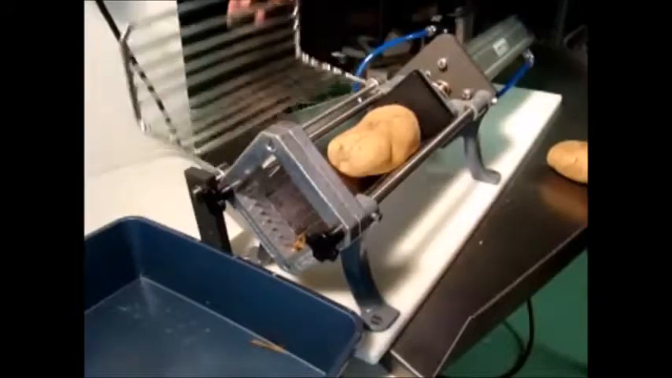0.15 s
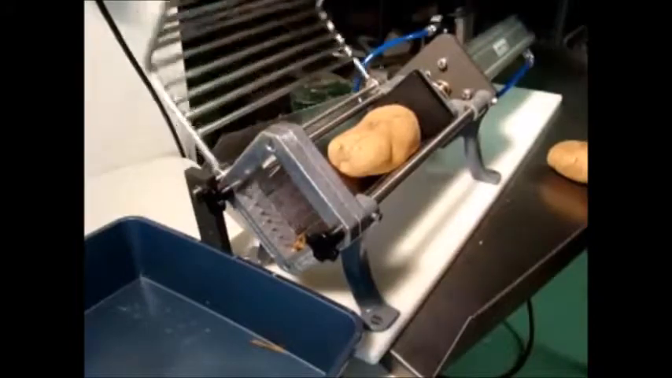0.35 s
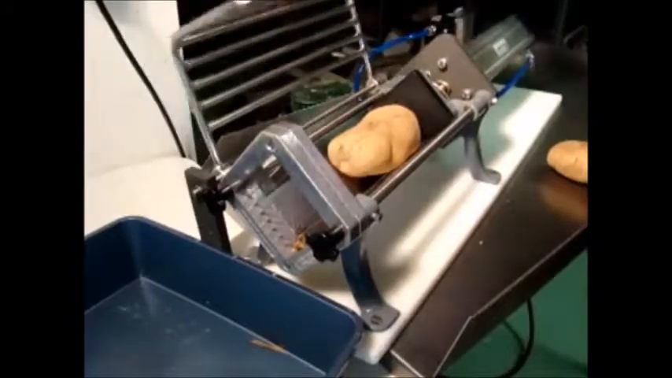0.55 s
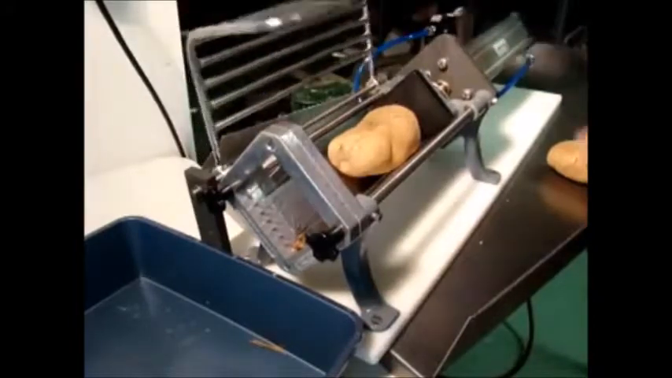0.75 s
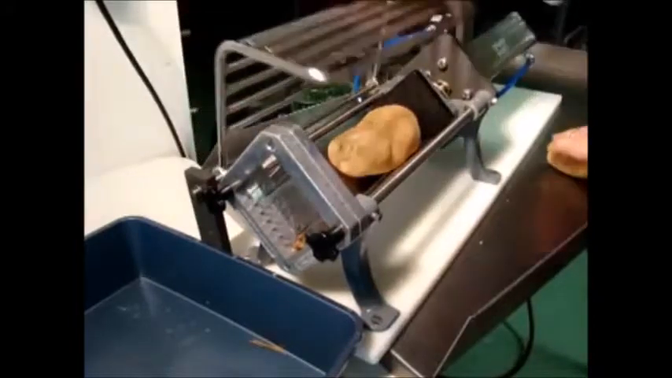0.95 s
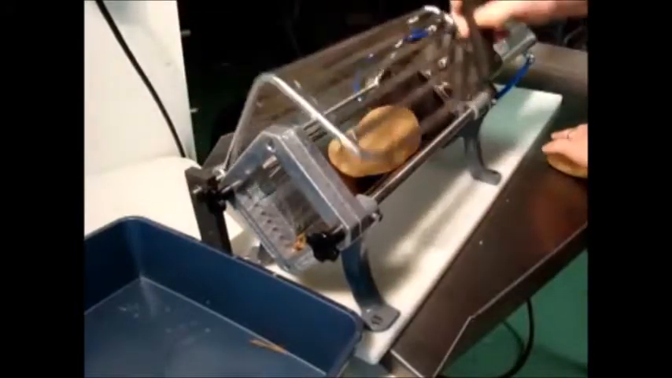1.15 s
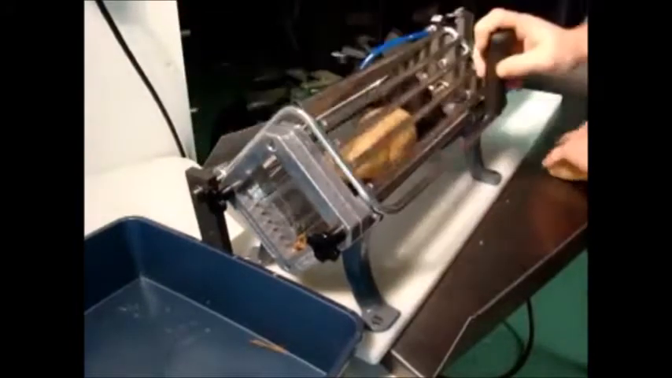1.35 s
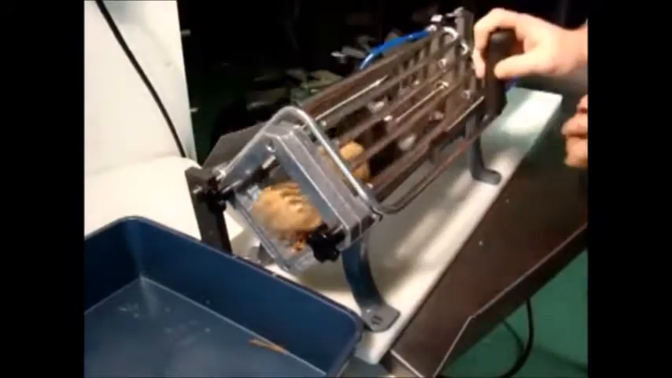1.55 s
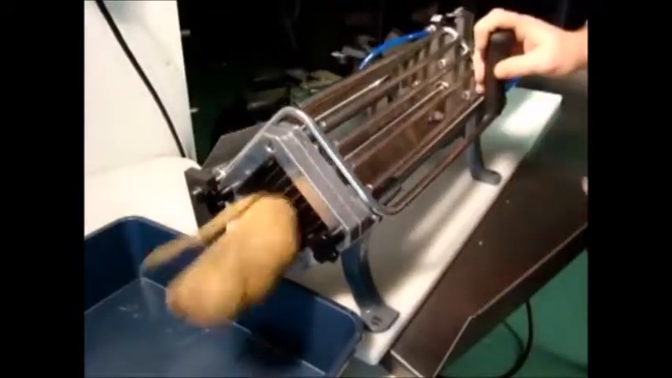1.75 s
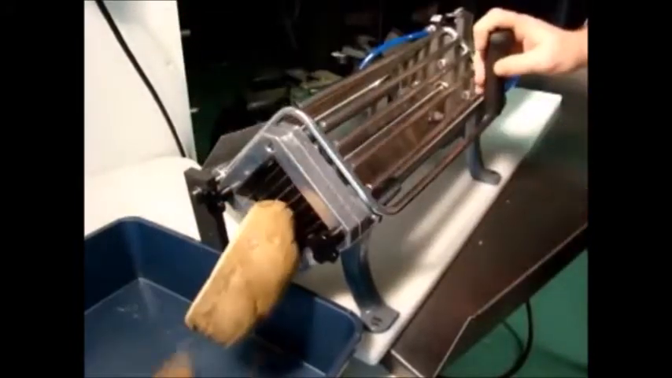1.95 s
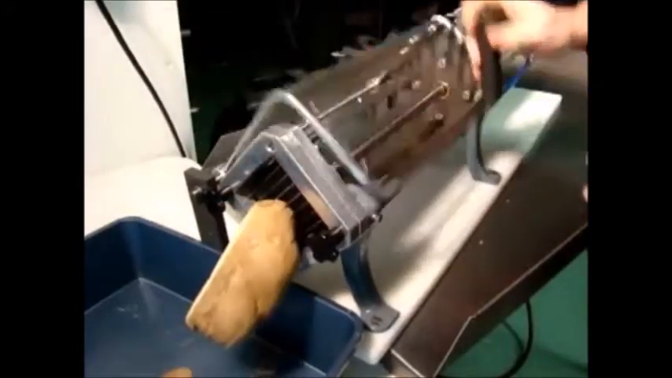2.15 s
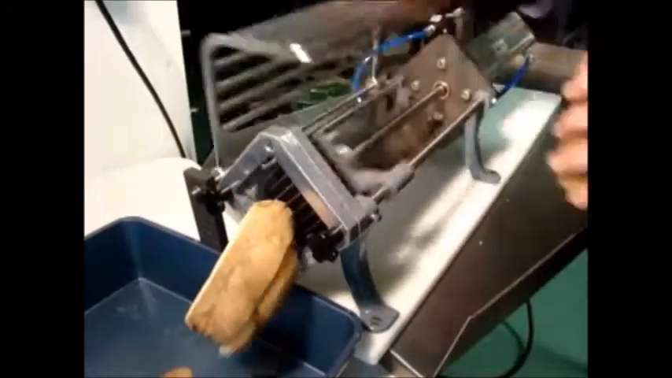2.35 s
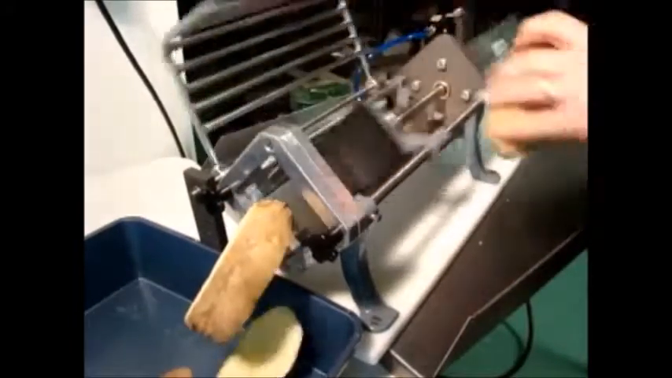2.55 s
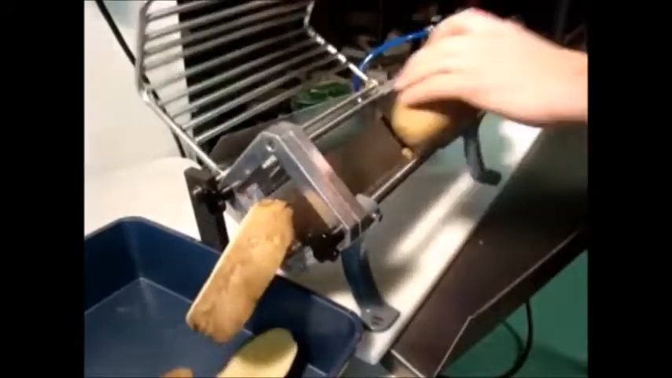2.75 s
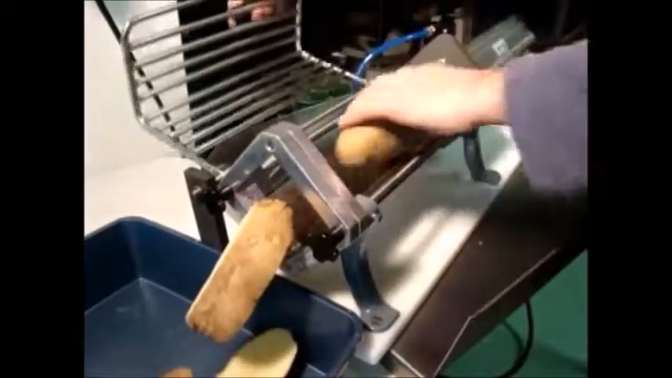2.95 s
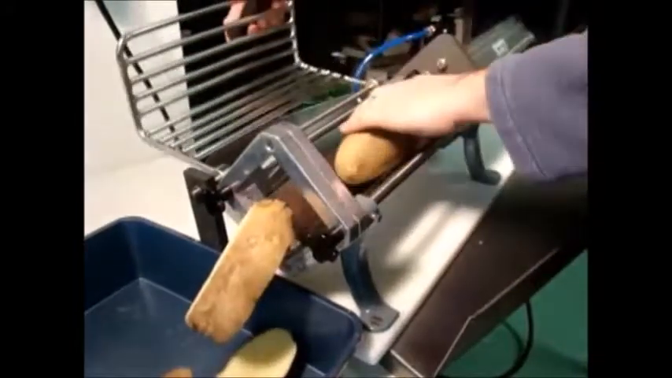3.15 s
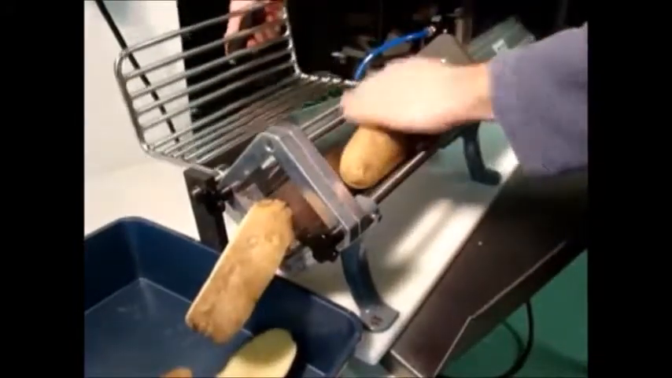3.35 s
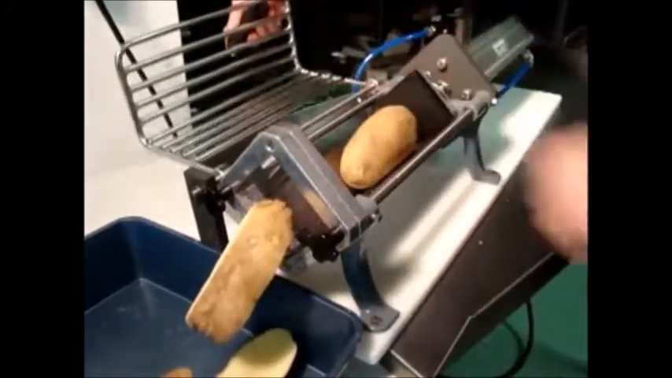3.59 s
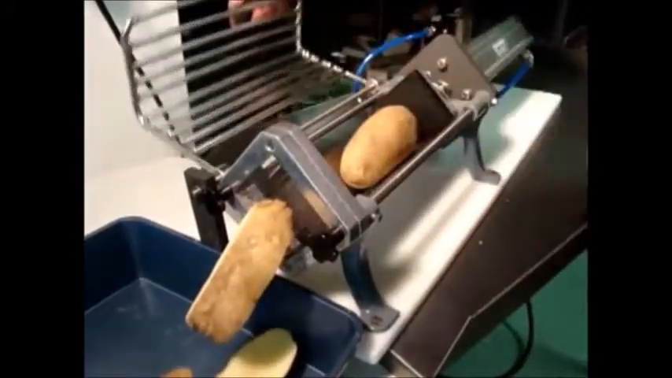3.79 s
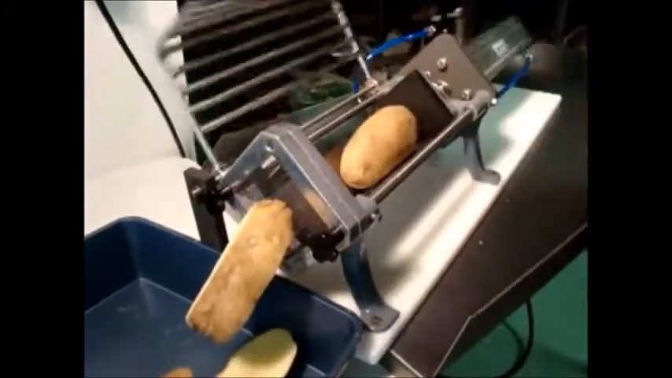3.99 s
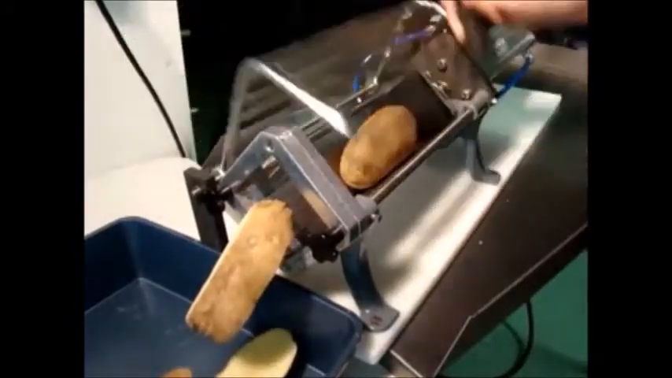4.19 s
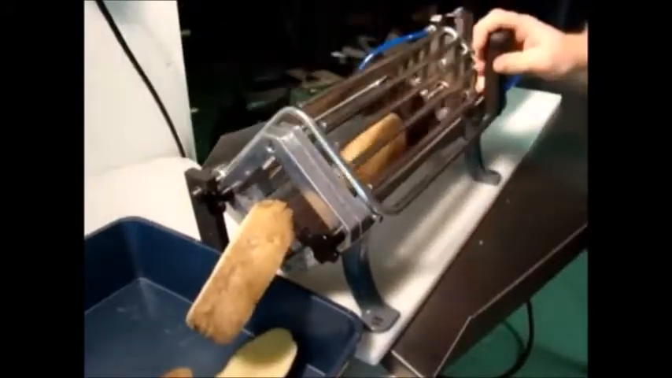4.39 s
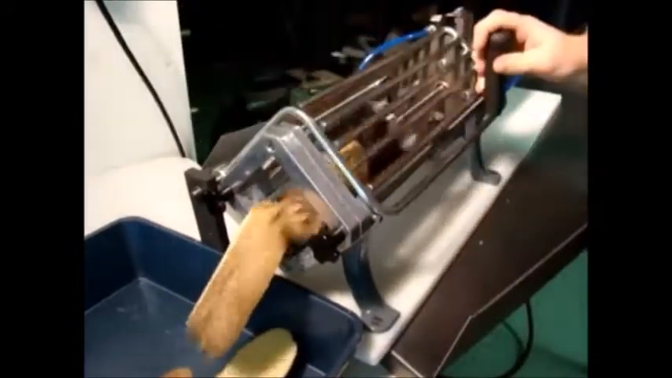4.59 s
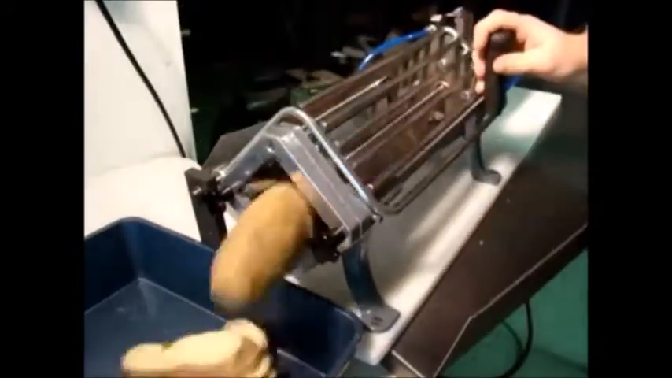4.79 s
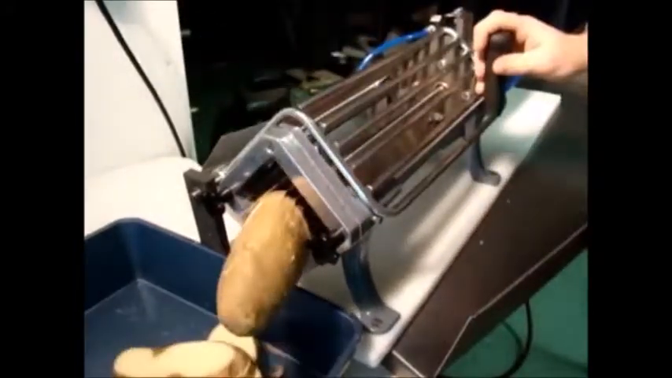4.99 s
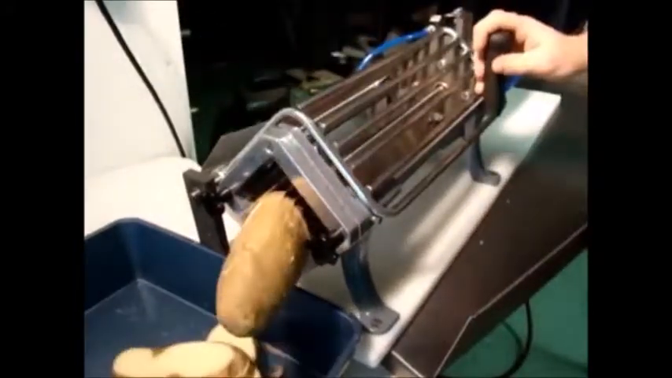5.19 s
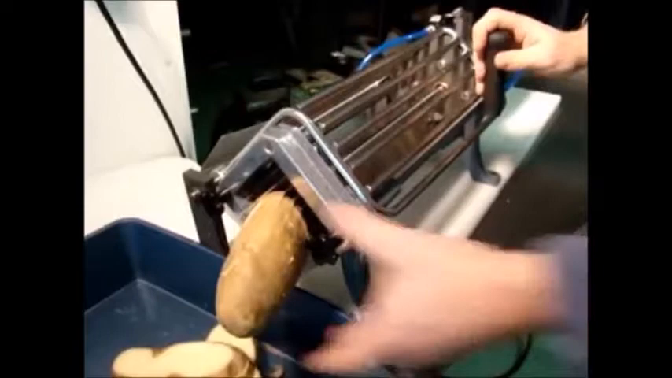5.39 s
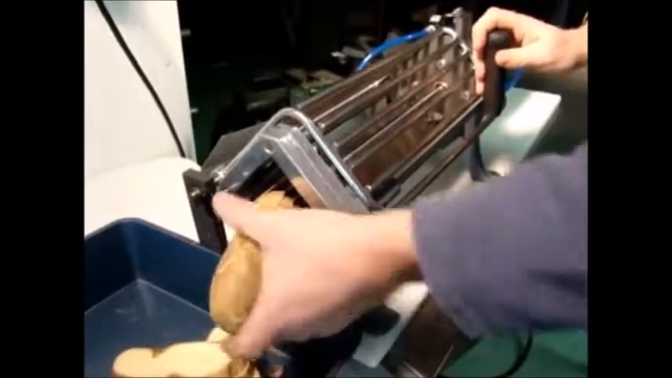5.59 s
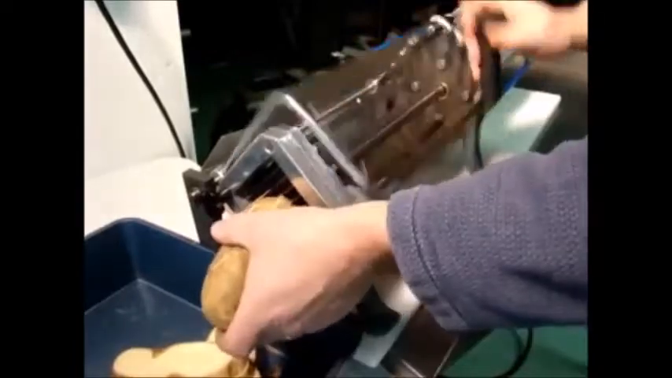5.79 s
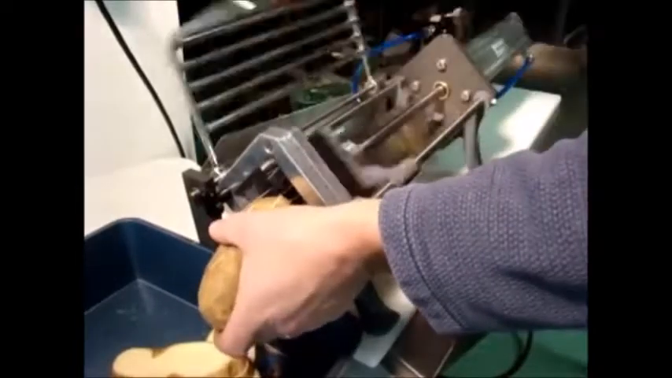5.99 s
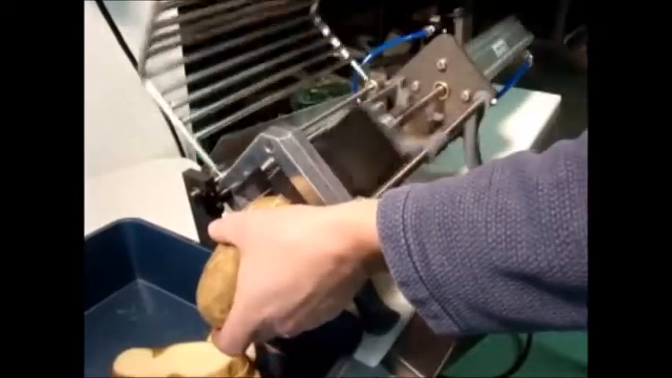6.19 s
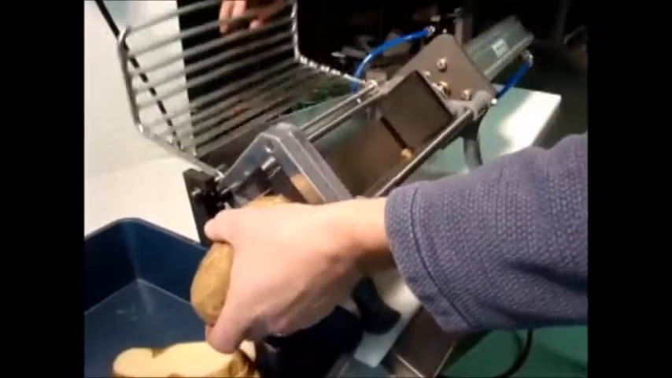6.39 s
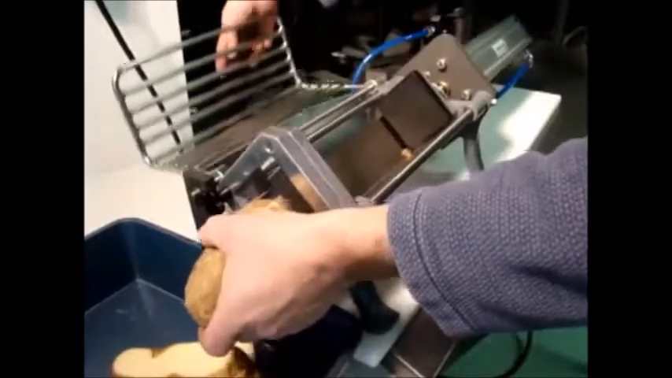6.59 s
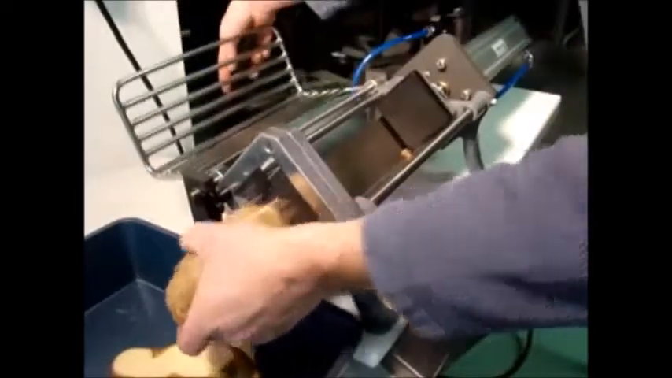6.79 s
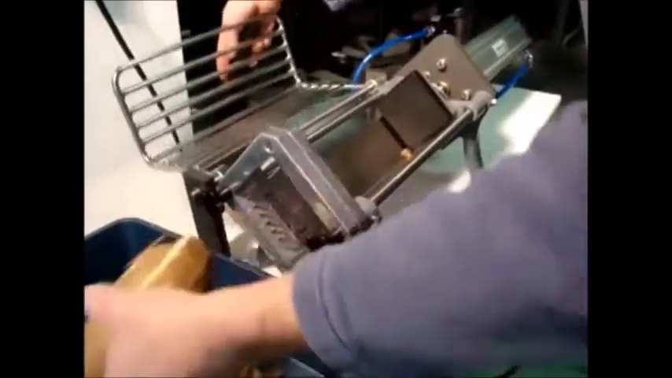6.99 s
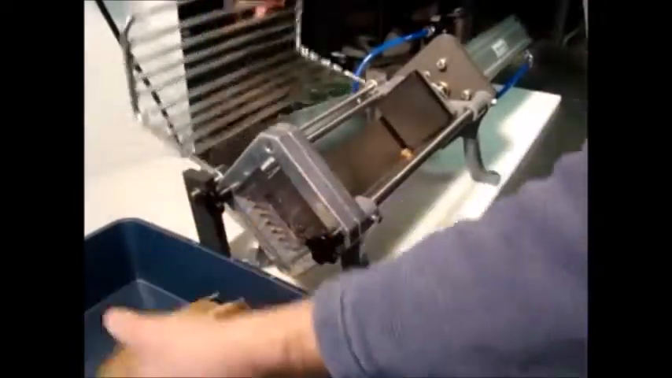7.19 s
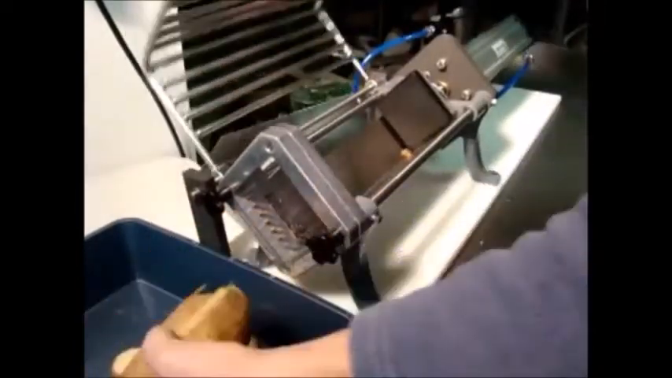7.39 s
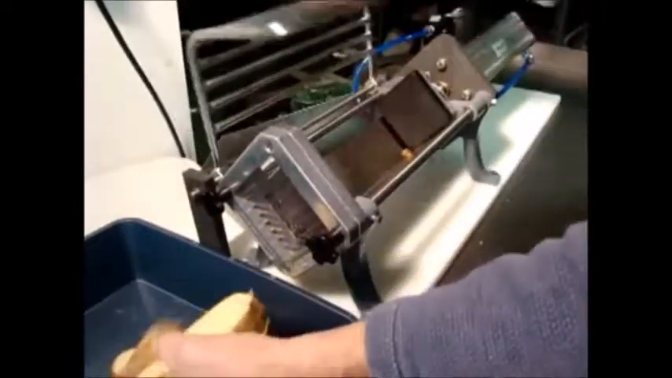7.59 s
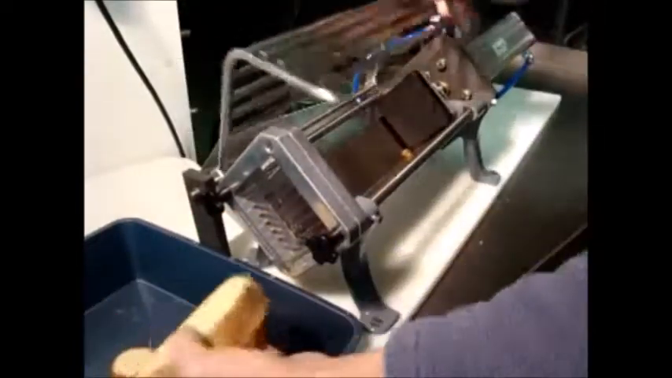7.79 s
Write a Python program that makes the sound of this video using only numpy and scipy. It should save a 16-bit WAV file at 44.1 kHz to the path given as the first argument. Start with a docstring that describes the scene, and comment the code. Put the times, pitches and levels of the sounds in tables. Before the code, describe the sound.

A reverberant workshop with low ventilation noise, faint electrical buzz and microphone hiss, picked up close in mono. Slight sleeve rubbing opens it. At 1.3 s a wire guard knocks shut with a short metallic rattle; at 1.5 a sharp, bright air blast bursts out for half a second as a potato cracks through knives, ending at 2.0 with a steel clack. Potato pieces bump hollowly on a plastic tub at 2.15. From 2.5 to 2.95 a thinner return hiss ends in a bouncing clack, with another tub bump at 2.7. Tiny high whistles and echo fade after each stroke. Quiet handling until the guard bangs harder at 4.4; hiss and crunch run 4.5 to 5.0, with a bump and clink. A soft low groan comes near 5.7-6.0, then the second return hiss, clacking at 6.57. Echo fades into soft rubbing and bumps, then a hinge tick and small clink around 7.8.

```python
"""An air-driven fry cutter on a steel bench in a hard-walled workshop cuts two potatoes over ventilation and buzz.
For each cut the wire guard knocks shut (rattle and modes) and the valve vents a sharp hiss (coloured noise)
while the ram drives the potato through the knives, which crack in bursts of noise; the stop clacks, last air whistles.
Pieces bump on a plastic tub; the ram returns with a thinner hiss and bounces on its rear stop.
A groan precedes the second return; rubbing, soft bumps, a hinge tick and a clink come last."""
import sys
import numpy as np
from scipy import signal
from scipy.fft import rfft, irfft
from scipy.io import wavfile
from scipy.ndimage import uniform_filter1d, minimum_filter1d

SR = 44100
rng = np.random.default_rng(int(sys.argv[2]) if len(sys.argv) > 2 else 0)


def unload_wav(signal):
    """Save mono or channel-first audio to the path in sys.argv[1] as 16-bit WAV at rate SR, clipped to [-1, 1]."""
    wavfile.write(
        sys.argv[1],
        SR,
        np.round(np.clip(np.atleast_2d(signal).T, -1, 1) * 32767).astype(np.int16),
    )


N = 346087
TIME = np.arange(N) / SR

# forward strokes: valve opens t/s, ram meets stop t/s, relative hiss level/dB,
# level offset at opening/dB, level offset at stop/dB, clack level/dB, whistle level/dB
PUSHES = [(1.473, 1.997, -11.5, -2, -0.5, 3.5, -22), (4.506, 5.019, -11.5, -0.5, 0, -2, -22.5)]
# return strokes: same columns
RETURNS = [(2.473, 2.955, -12, 1.5, 0.82, 7.4, -24.5), (6.063, 6.568, -13.6, 4.9, 2.9, 6.9, -31.5)]
# wire guard knocking on the frame: t/s, rattle level/dB, ring level/dB
GUARD_KNOCKS = [(.002, -45, -41), (1.298, -22, -21.5), (4.425, -11.5, -20)]
# potato bursting through the knives: t/s, level/dB
CUTS = [(1.533, -8), (4.555, -5)]
# spectrum of steel meeting steel: f/Hz, density/dB per Hz
STEEL_COLOUR = [(60, -39), (300, -13.5), (800, -21), (1400, 6), (2600, 6.5), (4000, 5), (6000, 4.5),
                (7500, -11), (10000, -38)]


def from_db(db):
    """Decibels to gain."""
    return 10 ** (np.asarray(db) / 20)


def rms_one(x):
    """Scale to rms 1."""
    return x / np.sqrt(np.mean(x ** 2) + 1e-20)


def at_hz(points, hz):
    """Read a table along log frequency."""
    freq, value = np.transpose(points)
    return np.interp(np.log(np.maximum(hz, 1)), np.log(freq), value)


def add(track, s, sound):
    """Mix a sound into a track at time s."""
    start = max(round(s * SR), 0)
    track[start:start + len(sound)] += sound[:max(N - start, 0)]


def drift(rate_hz):
    """Random wander: normal knots of spread 1 at the given rate, joined by lines."""
    knots = rng.standard_normal(N // 20)
    return np.interp(TIME * rate_hz, np.arange(len(knots)), knots)


def colour(x, spectrum, peaks=(), size=4096):
    """Minimum-phase filter with the given slope and resonances; white noise keeps its power."""
    hz = np.arange(size // 2 + 1) * SR / size
    db = at_hz(spectrum, hz)
    for centre_hz, width_hz, lift_db in peaks:
        db = db + lift_db / (1 + (2 * (hz - centre_hz) / width_hz) ** 2)
    # fold the cepstrum to make the response causal
    cepstrum = irfft(np.log(from_db(db)))
    cepstrum[1:size // 2] *= 2
    cepstrum[size // 2 + 1:] = 0
    response = irfft(np.exp(rfft(cepstrum)))
    return signal.oaconvolve(x, response / np.linalg.norm(response))[:len(x)]


def noise(spectrum, peaks=()):
    """Coloured noise of rms 1."""
    return rms_one(colour(rng.standard_normal(N), spectrum, peaks))


def tone(hz, waver_hz):
    """A slightly unsteady sine of rms 1."""
    pitch_hz = hz + waver_hz * drift(25)
    return np.sqrt(2) * np.sin(2 * np.pi * np.cumsum(pitch_hz) / SR)


def blows(hits, spectrum, t60, crack, peaks=(), size=N):
    """Each blow is a sharp contact (one sample) followed by a dense, quickly dying rattle."""
    t, out = TIME[:SR // 2], np.zeros(size)
    for s, db, *_ in hits:
        rattle = from_db(-60 * t / t60) * rng.standard_normal(len(t))
        rattle[0] = crack
        add(out, s, from_db(db) * rattle)
    return colour(out, spectrum, peaks)


def ringing(hits, modes):
    """Struck metal rings in its modes, each time a little differently; last hit column is ring level/dB."""
    t, out = TIME[:SR * 3 // 4], np.zeros(N)
    for s, *_, ring_db in hits:
        for k, (hz, db, t60) in enumerate(modes):
            level_db = ring_db + db + rng.normal()
            decay = from_db(level_db - 60 * t / t60)
            add(out, s, (-1) ** k * decay * np.cos(2 * np.pi * hz * t))
    return out


def rebounds(hits, gap_s, loss_db, count):
    """Each hit becomes a run of ever softer contacts."""
    return [(s + k * gap_s, db - k * loss_db) for s, db, *_ in hits for k in range(count)]


def swells(rows, attack_s, release_s):
    """Gain over time: each row (start/s, end/s, level/dB) rises, holds and dies away."""
    gain = np.zeros(N)
    for start, end, db in rows:
        rise = np.clip((TIME - start) / attack_s, 0, 1)
        gain += from_db(db) * rise * np.exp(-np.maximum(TIME - end, 0) / release_s)
    return gain


def stops(strokes):
    """When and how hard the ram meets its stop: (t/s, level/dB)."""
    return [(stop, clack_db) for _, stop, *_, clack_db, _ in strokes]


def background():
    """Ventilation noise and an electrical buzz of unsteady partials on twice the mains frequency."""
    # ventilation spectrum: f/Hz, density/dB per Hz
    floor = [(30, -15), (80, -8), (140, -7.5), (200, -0.5), (450, 1), (900, 0), (1600, -1.5), (2200, -6.5),
             (3500, -17), (6000, -12.5), (10000, -13)]
    # buzz partials: multiple of 120 Hz, relative level/dB
    partials = [(2, -72), (3, -70), (4, -63.5), (5, -75.5), (6, -68), (7, -65.5), (8, -85), (10, -65.5),
                (11, -70), (12, -76), (13, -61.5), (14, -67), (15, -66.5), (19, -66.5), (20, -77),
                (23, -68.5)]
    buzz = sum(from_db(db) * tone(k * 120, waver_hz=4.73) for k, db in partials)
    return from_db(-52) * noise(floor) + from_db(-1) * buzz


def handling_rubs():
    """Sleeve and hands rub about the machine: swelling, uneven coloured noise."""
    # movements: start t/s, end t/s, level/dB
    moves = [(-.03, .05, -35.5), (.17, 1.28, -54.5), (2.25, 2.6, -41), (4.03, 4.09, -45.5),
             (4.17, 4.38, -53), (5.75, 6.05, -53), (7.42, 7.6, -51.5), (7.62, 7.85, -44.5)]
    # rubbing spectrum: f/Hz, density/dB per Hz
    rub_colour = [(50, -27), (130, -11), (230, -5.5), (450, 1.5), (700, -3), (1000, -2.5), (1600, -5),
                  (3000, -5), (6000, -14.5), (10000, -15.5)]
    envelope = swells(moves, attack_s=0.031, release_s=0.069)
    return envelope * noise(rub_colour) * from_db(1.4 * drift(35))


def pressure_groan():
    """A soft, nearly steady tone while the cylinder holds pressure: faint, then in two swells."""
    # groans: start t/s, end t/s, level/dB
    groans = [(5.24, 5.9, -59), (5.715, 5.8, -45), (5.91, 6.02, -46.5)]
    envelope = swells(groans, attack_s=0.02, release_s=0.031)
    return envelope * tone(397, waver_hz=5.15) * from_db(1.5 * drift(24))


def hinge_ticks():
    """A small bright tick of the guard's hinge: a short treble rattle."""
    # ticks: t/s, level/dB
    ticks = [(7.818, -17.5)]
    # tick spectrum: f/Hz, density/dB per Hz
    tick_colour = [(300, -25), (3000, -14), (6000, -4), (9500, 2)]
    return blows(ticks, tick_colour, t60=0.023, crack=1.5)


def bench_thuds():
    """The bench answers each cut, knock, forward stop and shove with a dull thud; shoves rock back once."""
    # shoves: t/s, level/dB
    shoves = [(.815, -52.5), (1.13, -49), (2.3, -44.5), (3.39, -45.5), (4.915, -37), (5.18, -47.5),
              (6.065, -43)]
    # thud spectrum: f/Hz, density/dB per Hz
    thud_colour = [(30, -18.5), (90, -7), (175, -1), (280, -7.5), (700, -10), (3000, -58)]
    cuts = [(s, db - 39) for s, db in CUTS]
    knocks = [(s, db - 31) for s, db, _ in GUARD_KNOCKS]
    landings = [(s, -38) for s, _ in stops(PUSHES)]
    rocking = rebounds(shoves, gap_s=0.056, loss_db=7.5, count=2)
    return blows(cuts + knocks + landings + rocking, thud_colour, t60=0.38, crack=3)


def tub_bumps():
    """Potato and hands bump on tub and tray: hollow knocks pitched by spot, each with a softer second touch."""
    # bumps: t/s, level/dB, pitch of the spot f/Hz
    bumps = [(.46, -43.5, 700), (2.142, -14, 1100), (2.177, -10.5, 656), (2.387, -28, 1500),
             (2.714, -12, 620), (4.045, -43, 900), (4.91, -18, 400), (5.81, -44, 700), (5.94, -41.5, 700),
             (7.657, -33.5, 700), (7.74, -40, 650), (7.797, -37, 500)]
    # bump spectrum: f/Hz, density/dB per Hz
    bump_colour = [(60, -30.5), (200, -15), (400, -7.5), (650, -6), (1200, -1), (2500, -3.5), (5000, -10),
                   (10000, -35)]
    # hollow resonances of the plastic tub: f/Hz, width/Hz, lift/dB
    tub = [(250, 50, 7), (605, 90, 6), (805, 150, 6.5)]
    out = np.zeros(N)
    for s, db, spot_hz in bumps:
        touches = rebounds([(0, db)], gap_s=.013, loss_db=8.5, count=2)
        peaks = tub + [(spot_hz, 390, 9)]
        add(out, s, blows(touches, bump_colour, t60=0.067, crack=2.2, peaks=peaks, size=SR))
    return out


def guard_knocks():
    """The wire guard falls shut and rebounds once: a rattle, a bright bite on steel, a low chattering ring."""
    # rattle spectrum: f/Hz, density/dB per Hz
    guard_colour = [(60, -43), (170, -16), (300, -4.5), (600, 0), (1100, 3), (1900, -2.5), (2900, -6.5),
                    (4500, -18.5), (10000, -20.5)]
    # guard modes: f/Hz, relative level/dB, t60/s
    guard_modes = [(173.5, -16.5, 0.36), (346, -15, 0.3), (405, -11.5, 0.42), (461, -14.5, 0.45),
                   (511, -11.5, 0.32), (623, -9.5, 0.26), (830, -8.5, 0.15), (938, -18.5, .25),
                   (1125, -9, 0.11), (1526, -22, 0.17), (1660, -23, .16), (1800, -19, .12),
                   (2460, -27, .08)]
    # bright bite of wire on steel: f/Hz, width/Hz, lift/dB
    guard_bite = [(2850, 1100, 11)]
    contacts = rebounds(GUARD_KNOCKS, gap_s=.007, loss_db=5, count=2)
    rattle = blows(contacts, guard_colour, t60=0.073, crack=1.8)
    # 1.38 dB of bite per dB of knock: harder knocks are brighter
    bites = [(s, 1.38 * db + 1.5) for s, db in contacts]
    bite = blows(bites, STEEL_COLOUR, t60=0.039, crack=1.5, peaks=guard_bite)
    chatter = from_db(2 * drift(70))  # loose wires make the ring uneven
    return rattle + bite + ringing(GUARD_KNOCKS, guard_modes) * chatter


def potato_cuts():
    """Each potato cracks three times on the knives: its skin, its body, its tail end."""
    # crack spectrum: f/Hz, density/dB per Hz
    cut_colour = [(60, -30), (180, -3), (400, -13.5), (900, 4.5), (1600, 2.5), (3000, -11), (6000, -4),
                  (10000, -10)]
    skins = [(s - 0.0065, db - 8.5) for s, db in CUTS]
    tails = [(s + .025, db - 6.5) for s, db in CUTS]
    return blows(skins + CUTS + tails, cut_colour, t60=0.05, crack=1.7)


def ram_clacks():
    """The ram kicks off, lands dead on the front stop and bounces on the rear one; loose steel parts clink."""
    # ram modes: f/Hz, relative level/dB, t60/s
    ram_modes = [(1223, -0.5, 0.0067), (1440, -22.5, 0.6), (1557, -22.5, 0.49), (2050, -14, .08),
                 (2740, -11.5, 0.1), (3560, -20.5, .07), (3930, -10, 0.14), (3880, -34.5, .2),
                 (5770, -16.5, .04)]
    # clinks: t/s, level/dB
    clinks = [(4.995, -16), (7.842, -31)]
    kicks = [(start + .0065, -18, -8.5) for start, *_ in PUSHES]  # t/s, contact/dB, ring/dB
    bounces = rebounds(stops(RETURNS), gap_s=.0055, loss_db=7.5, count=3)
    contacts = kicks + stops(PUSHES) + bounces + clinks
    rings = kicks + [(s, -5.5) for s, _ in stops(PUSHES + RETURNS)] + clinks
    return blows(contacts, STEEL_COLOUR, t60=0.018, crack=1.1) + ringing(rings, ram_modes)


def whistles(strokes, notes, waver_hz, breathy):
    """After each stop the last air sings in the valve gap: short notes gliding in pitch, the second lower."""
    out = np.zeros(N)
    waver = waver_hz * drift(900)
    for _, stop, *_, whistle_db in strokes:
        for delay_s, length_s, start_hz, end_hz, db in notes:
            part = np.clip((TIME - stop - delay_s) / length_s, 0, 1)
            on = np.flatnonzero((part > 0) & (part < 1))
            pitch_hz = end_hz + (start_hz - end_hz) * (1 - part[on]) ** 2 + waver[on]
            note = np.sqrt(2) * np.sin(2 * np.pi * np.cumsum(pitch_hz) / SR)
            out[on] += from_db(whistle_db + db) * np.sqrt(np.sin(np.pi * part[on])) * note
    return out * (1 + breathy * drift(700))


def valve_whistles():
    """Dying pressure sounds two notes in each port."""
    # notes: delay after stop/s, length/s, start f/Hz, end f/Hz, level re stroke's whistle/dB
    push_notes = [(0.102, .035, 8200, 8500, -6.5), (0.21, 0.033, 6640, 6500, 1)]
    # same columns
    return_notes = [(.097, .023, 8650, 8540, -1.5), (.191, 0.0414, 6980, 6450, 0.65)]
    push_whistle = whistles(PUSHES, push_notes, waver_hz=100, breathy=0.78)
    return push_whistle + whistles(RETURNS, return_notes, waver_hz=150, breathy=0.62)


def air_flow(strokes, overrun_s, open_s, settle_s, stop_shift_s, shut_s):
    """Valve opens: level starts higher or lower, settles to a steady blow, may shift at the stop, ends fast."""
    flow = np.zeros(N)
    for start, stop, db, opening_db, at_stop_db, *_ in strokes:
        since = np.maximum(TIME - start, 0)
        left = stop + overrun_s - TIME  # air flows on briefly after the ram stops
        gate = np.minimum(since / open_s, 1) ** 2 * np.exp(np.minimum(left, 0) / shut_s)
        opening_shift_db = opening_db * np.exp(-since / settle_s)
        stop_shift_db = at_stop_db * np.exp(-np.abs(left) / stop_shift_s)
        flow += gate * from_db(db + opening_shift_db + stop_shift_db)
    return flow


def port_song(flow):
    """The forward port's narrow, breathy resonance grows as the ram nears its stop."""
    song_hz, width_hz = 1955, 170
    nearness = sum(np.exp(-np.abs(TIME - stop) / 0.077) for _, stop, *_ in PUSHES)
    resonance = signal.iirpeak(song_hz, song_hz / width_hz, fs=SR)
    breath = rms_one(signal.lfilter(*resonance, rng.standard_normal(N)))
    return from_db(-2) * flow * nearness * breath


def jet(flow, spectrum, peaks, flutter_db):
    """Turbulent air through an exhaust port: resonant noise with fluttering level."""
    return flow * noise(spectrum, peaks) * from_db(flutter_db * drift(220))


def exhaust_hiss(push, back):
    """Air vents through the forward and return ports, each with its own spectrum and resonances."""
    # port spectra: f/Hz, density/dB per Hz
    push_air = [(60, -31), (200, -48.5), (420, -7), (700, -20), (1000, 1), (1400, -8), (2200, 1.5),
                (3500, 5), (5400, 2), (7000, 3), (8200, 7), (10000, 0.5)]
    return_air = [(60, -33.5), (200, -38), (350, -17.5), (550, -6), (1100, -8.5), (2400, -4.5),
                  (3400, -3.5), (5000, -1.5), (7000, 1), (8300, 6), (10000, 1.5)]
    # port resonances: f/Hz, width/Hz, lift/dB
    push_port = [(1130, 40, 3.7), (1875, 126, 12), (2170, 150, 7.1), (2780, 220, 3.3), (3100, 34, 1.4),
                 (4060, 140, 4.3), (6300, 56, 2.7), (6700, 50, 2.8), (7750, 74, 3.6), (7560, 170, 2.5),
                 (9340, 260, 5.9), (8840, 120, 5.6)]
    return_port = [(1450, 50, 1), (1886, 50, 12), (2150, 80, 4.4), (3870, 150, 7.8), (4380, 88, 2.9),
                   (5600, 100, 1.7), (6470, 180, 5.3), (7240, 170, 3.1), (8950, 430, 5.3), (9760, 70, 3.9),
                   (9880, 70, 7.4)]
    push_hiss = from_db(4.0) * jet(push, push_air, push_port, flutter_db=1.4)
    return push_hiss + from_db(4.5) * jet(back, return_air, return_port, flutter_db=0.9)


def thrown_air(push, back):
    """The jet thrown away from the bench into the hall, coloured by bench and frame resonances."""
    # thrown spectrum: f/Hz, density/dB per Hz
    thrown_colour = [(80, -34), (250, -15.5), (480, -2.5), (700, -0.5), (1050, 1), (1500, 2.5), (2200, 2.5),
                     (3500, -1), (5500, 0), (7500, 3), (10000, -2)]
    # bench and machine frame resonances: f/Hz, width/Hz, lift/dB
    frame = [(492, 45, 5), (646, 13, 7), (1420, 250, 1), (1556, 120, 3), (3830, 200, 0), (4930, 400, 1),
             (8760, 280, 2.5)]
    return (from_db(-5.5) * push + from_db(-7.0) * back) * noise(thrown_colour, frame)


def hall(x, build_s, count=12):
    """Diffuse echoes build up, then die band by band, the high treble fastest."""
    # hall decay: f/Hz, t60/s
    hall_t60 = [(150, 0.77), (500, 0.77), (1500, 0.99), (4000, 0.9), (7000, 0.69), (10000, 0.59)]
    t = TIME[:SR * 3 // 2]
    white, hz = rfft(rng.standard_normal(len(t))), np.fft.rfftfreq(len(t), 1 / SR)
    edges_hz = np.geomspace(80, 11000, count + 1)
    tail = np.zeros(len(t))
    for low, high in zip(edges_hz, edges_hz[1:]):
        band = irfft(white * (hz >= low) * (hz < high), len(t))
        tail += band * from_db(-60 * t / at_hz(hall_t60, np.sqrt(low * high)))
    tail *= 1 - np.exp(-t / build_s)
    return signal.oaconvolve(x, tail / np.linalg.norm(tail))[:N]


def scene():
    """Air, blows and handling close by; the hall answers jet, whistles, ram, guard and potatoes."""
    push = air_flow(PUSHES, overrun_s=0.011, open_s=0.0037, settle_s=0.11, stop_shift_s=0.046, shut_s=0.0027)
    back = air_flow(RETURNS, overrun_s=0.011, open_s=0.0033, settle_s=0.033, stop_shift_s=0.034,
                    shut_s=0.00061)
    whistle, ram, guard = valve_whistles(), ram_clacks(), guard_knocks()
    potato = potato_cuts() + tub_bumps()
    sent = thrown_air(push, back) + from_db(-12.5) * whistle + from_db(-11.5) * ram
    sent += from_db(-13.5) * guard + from_db(-15.5) * potato
    mix = background() + handling_rubs() + pressure_groan() + hinge_ticks() + bench_thuds()
    mix += potato + guard + ram + whistle
    mix += port_song(push) + exhaust_hiss(push, back) + hall(sent, build_s=0.015)
    return np.tile(mix, (2, 1))


def gain_control(x, threshold_db, share, attack_s, release_db_per_s):
    """The gain ducks soon after a loud sound starts and creeps back afterwards."""
    pole = np.exp(-1 / (attack_s * SR))
    power = signal.lfilter([1 - pole], [1, -pole], x ** 2)
    over_db = np.maximum(10 * np.log10(power + 1e-12) - threshold_db, 0)
    cut_db = np.clip(share, 0, 1) * over_db
    # hold each cut, then let it go at a steady rate
    ramp_db = release_db_per_s * TIME
    held_db = np.maximum.accumulate(cut_db + ramp_db) - ramp_db
    return from_db(-signal.lfilter([1 - pole], [1, -pole], held_db))


def limiter(x, top, size):
    """The gain dips briefly around peaks that would overload; size in samples."""
    room_left = np.minimum(1, top / (np.abs(x) + 1e-9))
    return x * uniform_filter1d(minimum_filter1d(room_left, size), size)


def record(dry):
    """One microphone on both channels: automatic gain, own hiss, treble cut-off, limited peaks."""
    # microphone hiss spectrum: f/Hz, density/dB per Hz
    mic_hiss = [(60, -7.5), (1000, -4.5), (4000, 2.5), (10000, -1.5)]
    cutoff_hz = 10120
    top_cut = signal.ellip(12, .1, 80, cutoff_hz, fs=SR, output="sos")
    gain = gain_control(dry[0], threshold_db=-22.5, share=0.6, attack_s=0.05, release_db_per_s=5.0)
    x = signal.sosfilt(top_cut, dry * gain + from_db(-54.5) * noise(mic_hiss))
    limited = limiter(x, top=.85, size=60)
    return signal.sosfiltfilt(top_cut, limited)


dry = scene()
out = record(dry)
unload_wav(out)
```